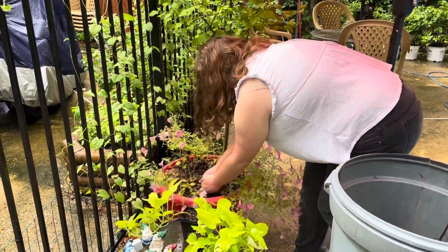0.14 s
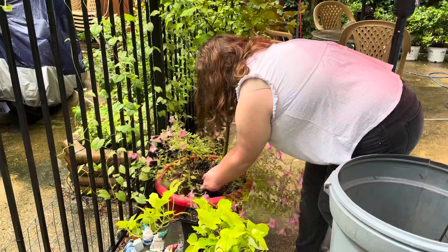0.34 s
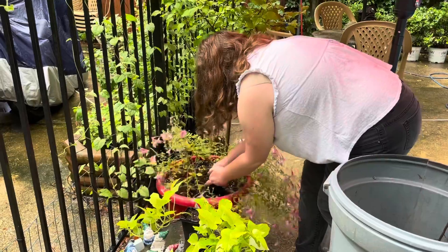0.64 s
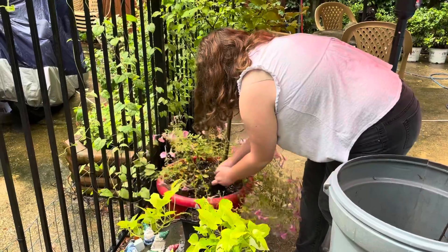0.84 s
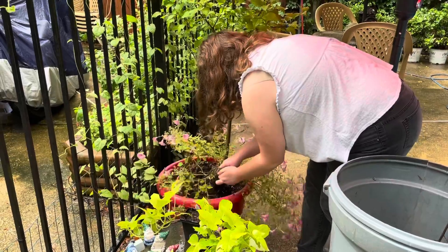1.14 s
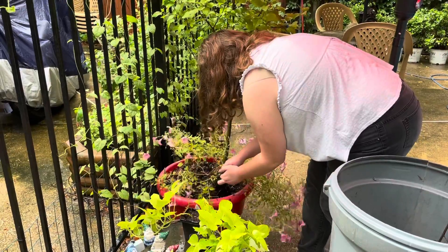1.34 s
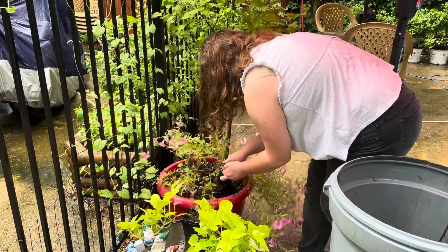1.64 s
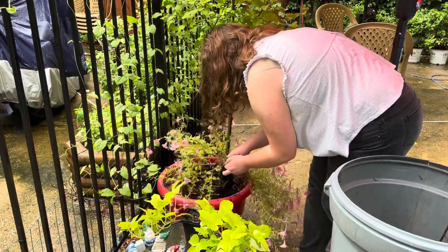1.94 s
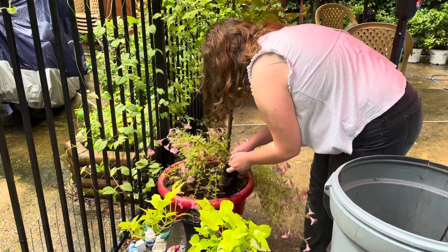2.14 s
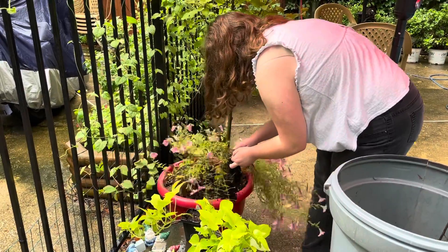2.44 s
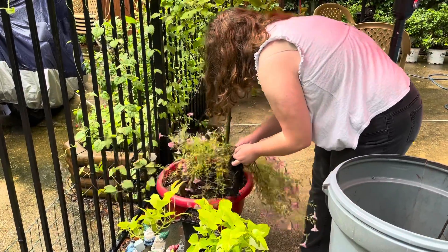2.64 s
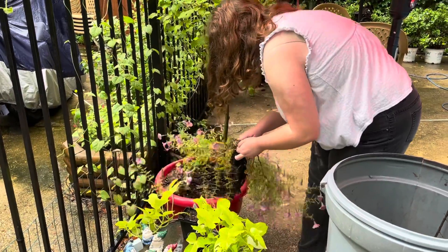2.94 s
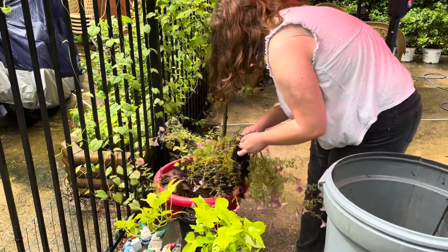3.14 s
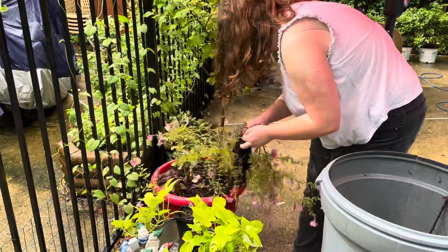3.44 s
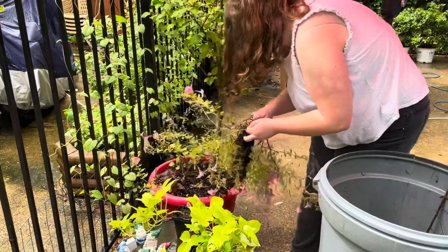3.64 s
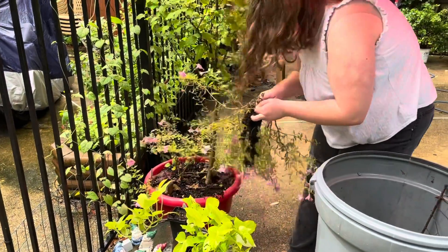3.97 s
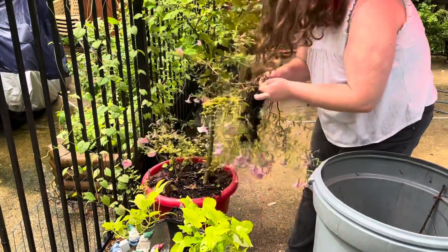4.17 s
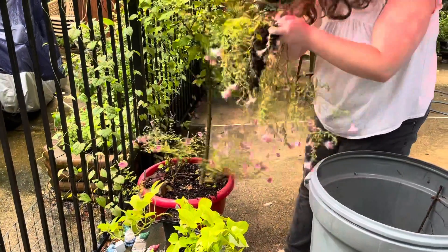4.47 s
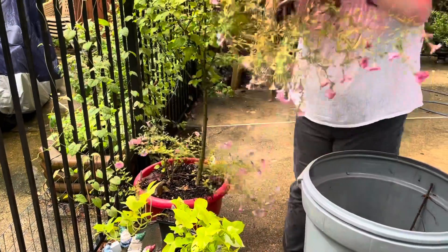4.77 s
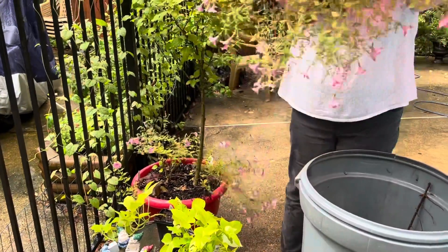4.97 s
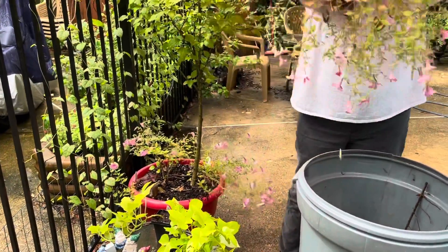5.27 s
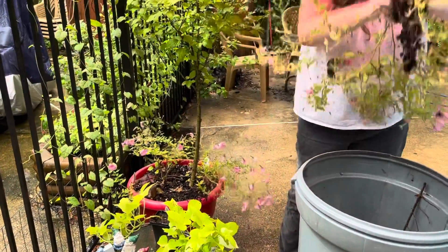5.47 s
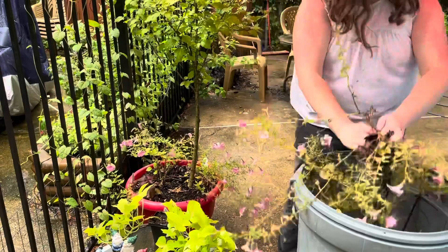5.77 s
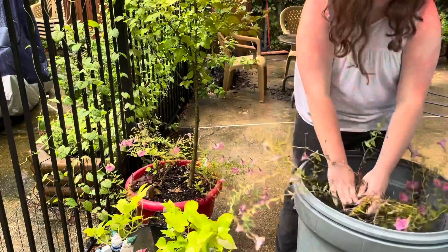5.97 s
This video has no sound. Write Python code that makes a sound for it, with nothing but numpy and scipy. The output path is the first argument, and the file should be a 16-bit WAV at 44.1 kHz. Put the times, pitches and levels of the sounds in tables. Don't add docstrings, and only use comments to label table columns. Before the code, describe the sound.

Catlike bird calls repeat outdoors over low engine rumble and soft hiss; stems tick, a pot knocks, then leafy thumps and scrapes fill a hollow bin.

```python
import sys
import numpy as np
from scipy import signal
from scipy.fft import rfft, irfft, next_fast_len
from scipy.io import wavfile
from scipy.ndimage import uniform_filter1d, map_coordinates

SR = 44100
rng = np.random.default_rng(int(sys.argv[2]) if len(sys.argv) > 2 else 0)


def pcm_store(signal):
    levels = np.round(np.clip(np.atleast_2d(signal), -1, 1) * 32767)
    wavfile.write(sys.argv[1], SR, levels.astype(np.int16).T)


def ratio(d):
    e = np.asarray(d, float) / 20
    return 10 ** e


N = 269451
TIME = np.arange(N) / SR


def unit(x):
    return x / np.sqrt(np.mean(x ** 2) + 1e-20)


def along(points, hz):
    f, v = np.transpose(points)
    return np.interp(np.log(hz + 1), np.log(f + 1), v)


def over_time(rows):
    s, value = np.transpose(rows)
    return np.interp(TIME, s, value)


def wobble(rate, count=N):
    knots = rng.standard_normal(int(count * rate / SR) + 4)
    return map_coordinates(knots, [np.arange(count) * rate / SR])


def tone(hz):
    return np.sin(2 * np.pi * np.cumsum(hz) / SR)


def filtered(x, response):
    m = next_fast_len(N + SR // 2)
    return irfft(rfft(x, m) * response(np.fft.rfftfreq(m, 1 / SR)), m)[..., :N]


def rush(spectrum, patchy_db):
    z = signal.stft(rng.standard_normal(N), nperseg=512)[2]
    field = uniform_filter1d(rng.standard_normal(z.shape), size=6, axis=0)
    field = uniform_filter1d(field, size=12, axis=1)
    x = signal.istft(z * ratio(patchy_db * unit(field)), nperseg=512)[1][:N]
    return unit(filtered(x, lambda hz: ratio(along(spectrum, hz))))


# frequency in Hz, decay time t60 in seconds.
GARDEN_T60 = [(1500, 0.44), (3000, 0.49), (6000, 0.47), (12000, 0.31)]


def echoes(x):
    hz, t, z = signal.stft(rng.standard_normal((2, SR * 3 // 4)), SR, nperseg=256)
    decay = ratio(-60 * t / along(GARDEN_T60, hz)[:, None])
    tail = signal.istft(z * decay, SR, nperseg=256)[1]
    tail = tail / np.linalg.norm(tail[0])
    delayed = np.pad(x, (400, 0))[None]
    return signal.fftconvolve(delayed, tail, axes=1)[:, :N]


# frequency in Hz, gain in dB.
TREBLE_ROLLOFF = [(13000, 0), (13900, -6), (14500, -24), (16000, -50)]


def treble_rolloff(hz):
    return ratio(along(TREBLE_ROLLOFF, hz))


# time in seconds, flow level in dB.
TRAFFIC_FLOW = [(0.0, -48.5), (0.41, -49), (1.29, -44.5), (1.62, -48), (2.04, -50.5), (2.5, -45),
                (2.76, -46), (3.91, -47), (4.1, -46.5), (4.54, -45), (5.78, -49.5), (6.11, -44)]
# frequency in Hz, density in dB per Hz.
RUMBLE_SPECTRUM = [(15, -52), (25, -37), (47, -6.5), (69, 0), (130, -5), (141, -6.5), (178, -14.5),
                   (243, -17.5), (292, -24), (400, -49), (520, -58), (880, -120)]


def engines():
    rumble = ratio(over_time(TRAFFIC_FLOW) + 1.6 * wobble(3.29)) * rush(RUMBLE_SPECTRUM, patchy_db=0.0)
    leaving_s = 1.18
    drone = ratio(-59) + ratio(-55) * np.exp(-(TIME / leaving_s) ** 4)
    rumble += drone * ratio(2.2 * wobble(7.5)) * tone(168 + 2.5 * wobble(5.6))
    rumble += ratio(-50.5 + 1.1 * wobble(4.8)) * tone(65.8 + 2.54 * wobble(6))
    return np.array([rumble, 0.067 * rumble])


# frequency in Hz, density in dB per Hz.
AIR_SUM = [(120, -2), (200, -1), (243, -4.5), (387, -3), (595, -7.5), (913, -5.5), (1560, -7.5), (3810, -9),
           (7000, -18), (8070, -27.5), (8670, -42), (9310, -30), (10000, -23), (14300, -21)]
# frequency in Hz, density in dB per Hz.
AIR_DIFFERENCE = [(18, -43), (30, -21), (70, -3), (235, -9), (508, -8.5), (563, -7), (894, -4.5),
                  (1740, -4.5), (2090, -8), (6640, -16.5), (9040, -14.5), (12000, -24.5), (14000, -45)]


def tyres_and_leaves():
    flow_db = over_time(TRAFFIC_FLOW)
    tyre_db = -51.5 + 0.18 * (flow_db - flow_db.mean()) - 0.5 * TIME
    leaf_db = 3 - 55.0 - 1.06 * TIME
    hiss = np.array([ratio(5.0) * rush(AIR_SUM, patchy_db=1.82),
                     ratio(4.0) * rush(AIR_DIFFERENCE, patchy_db=1.4)])
    tyres = filtered(hiss, lambda hz: 1 / (1 + (hz / 1800) ** 4))
    return filtered(ratio(tyre_db) * tyres + ratio(leaf_db) * (hiss - tyres), treble_rolloff)


# start in seconds, level in dB, frequency in Hz, decay time t60 in seconds.
KNOCK_EVENTS = [(0.13, -56, 1600, .03), (0.872, -46, 415, .16), (0.895, -44, 235, 0.14),
                (0.925, -48, 350, 0.14), (0.97, -46, 115, .15), (1.005, -45, 265, 0.16),
                (1.07, -49, 260, .14), (1.11, -45, 90, 0.3), (3.085, -52, 1400, .03),
                (4.571, -44, 110, 0.24), (5.271, -41, 360, 0.04)]


def knocks():
    out, t = np.zeros(N + SR), TIME[:SR // 2]
    fall = 1.08
    for s, db, hz, t60 in KNOCK_EVENTS:
        envelope = ratio(db + 9.5 - 60 * t / t60 + 2.2 * wobble(76, len(t)))
        onset = 1 - np.exp(-t * hz / 3)
        ring = np.sin(2 * np.pi * hz * t * (1 - fall * t))
        out[round(s * SR):][:len(t)] += envelope * ring * onset
    return out[:N]


# start in seconds, peak level in dB, body level in dB.
TICK_EVENTS = [(0.1794, -63, 17), (0.6129, -32, 4), (1.2004, -35, -9), (1.515, -34, 0), (2.4194, -56, -3),
               (2.489, -66, -6), (3.0894, -46, 24), (4.0694, -43, 8), (4.6853, -43, -3), (4.845, -36.5, 15),
               (4.946, -36.5, -4), (5.107, -40, 9), (5.3682, -41, 2), (5.405, -36.5, -4), (5.888, -36, -2)]


def stem_ticks():
    out, count = np.zeros(N + SR), SR // 2
    t60 = 0.026
    for s, db, body_db in TICK_EVENTS:
        crack = rng.standard_normal(count + 2) * ratio(-60 * TIME[:count + 2] / t60)
        bright = np.diff(crack)[1:]
        out[round(s * SR):][:count] += ratio(db - 10.0) * (bright + ratio(body_db - 27) * crack[2:])
    return out[:N]


# time in seconds, share of pitch lost, glide in seconds.
SLIPS = [
    (.435, .045, .014),
    (.512, .11, .008),
    (.95, .045, .016),
    (1.024, .085, .008),
    (2.095, .04, .02),
    (2.17, .05, .03),
    (3.39, .045, .012),
    (4.46, .022, .02),
    (4.52, .02, .02),
    (5.895, .04, .015),
]


def membrane_pitch(row, scoop, hoarse, t):
    start, end, held_hz, sag, _ = row
    low_share, settle_s, period_s = scoop
    age = t - start
    spring = 1 - low_share * np.exp(-age / settle_s) * np.cos(2 * np.pi * age / period_s)
    slack = np.ones(len(t))
    for s, share, glide in SLIPS:
        if start < s < end:
            slack *= 1 - share / (1 + np.exp((s - t) / glide * 2))
    drift = 1 + 0.004 * wobble(21.83, len(t)) + 0.022 * hoarse * wobble(45, len(t))
    return (held_hz - sag * age) * spring * slack * drift


# frequency in Hz, gain in dB.
THROAT = [(1500, -17), (2300, 7), (2650, 10), (3100, -0.5), (3550, 1), (3800, -21), (4350, -13.5),
          (4650, -21.5), (5400, -14), (6200, -2.5), (7050, -10.5), (9300, -11.5), (12400, -11.5),
          (14500, -32)]
# frequency in Hz, gain in dB.
LEAK = [(1200, -5), (2200, 2.5), (3000, 3.5), (4600, -1), (6300, 4.5), (8000, -1), (12000, 6), (14500, 8)]


def mew(row, scoop, voice, turn):
    start, end, _, _, call_db = row
    low_shut_db, upper_shut_db, swell, chip_db, hoarse_db = voice
    first = round(start * SR)
    t = TIME[first:first + SR // 2]
    age = t - start
    count = len(t)
    hoarse = np.interp(t, turn[:2], turn[2:])
    pitch_hz = membrane_pitch(row, scoop, hoarse, t)

    main_db = call_db + swell * age + (hoarse_db + 2 * wobble(70.7, count)) * hoarse
    main_db += -18 * np.clip(1 - age / 0.03, 0, 1)
    main_db += -5 * np.clip(1 - (end - t) / 0.1, 0, None)
    shut = (1 - 0.55 * (1 - np.exp(-(age / 0.075) ** 2))) * (1 - hoarse)
    low_db = main_db + low_shut_db * shut - 3.5 * hoarse
    upper_db = main_db + upper_shut_db * shut

    jitter = 1 + 0.004 * wobble(80, count) + 0.03 * hoarse * wobble(600, count)
    cycles = np.cumsum(pitch_hz * jitter) / SR
    order = np.arange(2, 38)[:, None] / 2

    def each_line(rate):
        return np.array([wobble(rate, count) for _ in order])

    throat_db = along(THROAT, order * pitch_hz) * (1 - 0.4 * hoarse)
    throat_db = throat_db - 4 * (np.abs(order * 2 - 10) < 0.5)
    paired = np.where(order % 1, 0.9 * hoarse ** 2, 1)
    flutter = ratio((1.5 + 2 * hoarse) * each_line(90.8) + 5 * np.sqrt(hoarse) * each_line(260))
    phase = 2 * np.pi * (order * cycles + rng.random(order.shape))
    lines = ratio(throat_db) * paired * flutter * np.cos(phase)
    lines *= ratio(4 * (order > 8.5) * each_line(14.6))
    beat = np.cos(2 * np.pi * np.cumsum(170 + 40 * wobble(30, count)) / SR)
    lines *= 1 + 2.6 * turn[2] * (order > 3.4) * beat

    call = np.zeros(N)
    span = call[first:][:count]
    bands = ((order < 3.4, low_db), ((order > 3.4) & (order < 6.6), main_db), (order > 6.6, upper_db))
    for chosen, level_db in bands:
        band = np.sum(lines * chosen, axis=0)
        power = np.abs(uniform_filter1d(band ** 2, size=900))
        span += ratio(level_db - 2.5) * band / np.sqrt(power + 1e-9)
    effort_db = uniform_filter1d((main_db + upper_db) / 2, size=2500)
    air = filtered(rng.standard_normal(N), lambda hz: ratio(along(LEAK, hz)))[:count]
    span += ratio(effort_db - 7.0 + 7.3 * hoarse) * unit(air)
    span *= np.clip(np.minimum(age / 0.0044, (end - t) / 0.048), 0, 1)
    chip_envelope = np.exp(-((age - 0.008) / 0.005) ** 2)
    span += ratio(call_db + chip_db) * chip_envelope * tone(6100 + 150 * wobble(400, count))
    return call


# start in seconds, end in seconds, held pitch in Hz, sag in Hz per second, level in dB.
MEWS = [
    (.242, 0.562, 898, 150, -44),
    (.755, 1.075, 923.5, 215, -47.5),
    (1.815, 2.242, 792, 82.5, -41),
    (3.116, 3.514, 768.7, 130, -38),
    (4.235, 4.652, 773, 4.6, -39),
    (5.539, 5.96, 783, 238, -39.5),
]
# share of pitch it starts low, time constant in seconds, spring period in seconds.
SCOOPS = [(.15, 0.012, 0.335), (0.159, .02, 0.54), (0.179, 0.0231, .13), (.16, 0.0163, .1),
          (.19, .022, .11), (.21, 0.0202, .11)]
# low harmonics with the beak shut in dB, upper harmonics likewise in dB,
# swell in dB per second, chip in dB, hoarse end in dB.
VOICES = [(-4.5, 4.5, -5.5, -5, -6), (0.5, 7, 14, -2, -3.5), (-26.5, -6.5, 8.5, -9, -8),
          (-31, -19, -5.5, -16, -6), (-39, -7.5, -6, -16, -7.5), (-29, -16.5, -7.5, -34, -5.5)]
# start in seconds, completion in seconds, hoarseness before (0-1), after (0-1).
BREAKS = [
    (.46, .54, .2, .55),
    (.99, 1.04, .17, .7),
    (2.08, 2.13, .05, 1),
    (3.36, 3.395, .06, 1),
    (4.52, 4.59, .06, 1),
    (5.73, 5.87, .07, .9),
]
# time in seconds, length in seconds, share lost (0-1).
FADES = [
    (3.187, .006, .7),
    (3.224, .009, .95),
    (3.264, .006, .85),
    (4.444, .008, .6),
    (5.628, .005, .8),
    (5.74, .008, .7),
    (5.8, .006, .6),
]
# frequency in Hz, phase in radians.
SIDE_PHASE = [(1500, .3), (2400, 1.1), (3100, 1.76), (4400, 0.068), (7000, 0.46), (12000, 1.9)]


def bird():
    total = np.zeros((2, N))
    for row, scoop, voice, turn in zip(MEWS, SCOOPS, VOICES, BREAKS):
        call = mew(row, scoop, voice, turn)
        total += call * ratio([[0.1], [-3]]) + ratio([[-5], [-4]]) * echoes(call)
    lost = sum(min(share, 1) * np.exp(-((TIME - s) / length) ** 2) for s, length, share in FADES)
    total -= lost * filtered(total, lambda hz: np.exp(-((hz - 3050) / 450) ** 4))

    def path(hz):
        return treble_rolloff(hz) * np.exp(1j * np.outer([0, 1], along(SIDE_PHASE, hz)))
    return filtered(total, path)


def grains():
    return unit(rng.standard_normal(N) * ratio(3.4 * wobble(70) + 4.5 * wobble(700)))


# frequency in Hz, width in Hz, level in dB.
BIN_MODES = [(277, 180, 1), (557, 150, 5.5), (910, 122, 5.5), (1415, 39, 2)]


def bin_wall(f):
    total = 0
    for k, (centre, width, db) in enumerate(BIN_MODES):
        damping = 1j * f * width
        total = total + (-1) ** k * ratio(db) * damping / (centre * centre - f * f + damping)
    return total


# time in seconds, force in dB.
RUSTLE = [
    (5.52, -77),
    (5.616, -41.5),
    (5.69, -57),
    (5.79, -38),
    (5.88, -40),
    (5.905, -32),
    (5.934, -78),
    (5.95, -38.5),
    (6.11, -42.5),
]
# start in seconds, peak level in dB, scrape level in dB.
BUMPS = [
    (5.575, -38.5, -6),
    (5.605, -37, -16),
    (5.71, -36, -13),
    (5.753, -33, -22),
    (5.774, -28, -24),
    (5.846, -34, -40),
    (5.892, -29.5, -4),
    (5.946, -34.5, -7),
    (6.004, -27.5, -28),
]
# frequency in Hz, gain in dB.
LEAF_SPECTRUM = [(700, -18), (1600, 3), (3000, -11), (6000, -16), (12000, -3.5), (14500, -16)]


def plant_in_bin():
    blows, scrapes, t = np.zeros(N + SR), np.zeros(N + SR), TIME[:SR // 2]
    for s, db, scrape_db in BUMPS:
        push = rng.standard_normal(len(t)) * ratio(db - 60 * t / 0.046) * (1 - np.exp(-t / 0.0052))
        blows[round(s * SR):][:len(t)] += push
        scrapes[round(s * SR):][:len(t)] += ratio(scrape_db) * push
    falling = (TIME > RUSTLE[0][0]) * ratio(over_time(RUSTLE))
    drum = filtered(ratio(11.5) * blows[:N] + ratio(5.5) * falling * grains(), bin_wall)
    friction = ratio(13) * scrapes[:N] + ratio(-18.5 + 16.5) * falling * grains()
    return drum + filtered(friction, lambda hz: ratio(along(LEAF_SPECTRUM, hz)))


def plant():
    near = knocks() + stem_ticks() + plant_in_bin()
    return near * ratio([[0.1], [-5]]) + ratio(-5.5) * echoes(near)


# frequency in Hz, gain in dB.
PORT_SUM = [(1000, 1.5), (6500, 5), (7800, -5), (8800, -19.5), (10000, -10), (11500, -4), (14000, -2),
            (15700, -15)]
# frequency in Hz, gain in dB.
PORT_DIFFERENCE = [(100, -11), (1000, -6), (3000, 3), (6000, 4), (9000, 2.5), (12000, -6.5), (13500, -17)]


def scene():
    traffic = engines() + tyres_and_leaves()
    ports = lambda hz: ratio([along(PORT_SUM, hz), along(PORT_DIFFERENCE, hz)])
    mid, side = filtered(bird() + plant(), ports) + traffic
    return np.array([mid + side, mid - side])


def top_cut(x):
    return signal.sosfilt(signal.butter(12, 15700, fs=SR, output="sos"), x)


def record(dry):
    mix = filtered(dry, lambda hz: hz < 15700)
    return top_cut(mix)


dry = scene()
out = record(dry)
pcm_store(out)
```